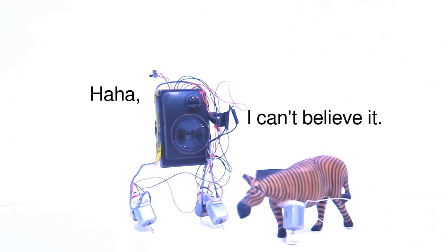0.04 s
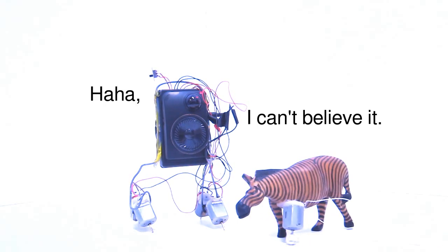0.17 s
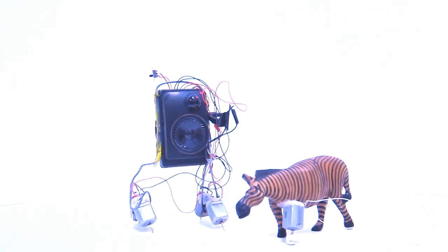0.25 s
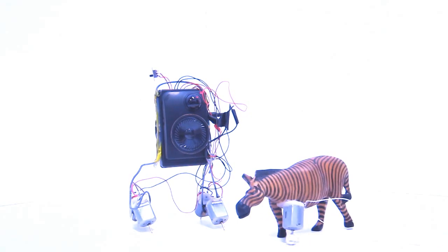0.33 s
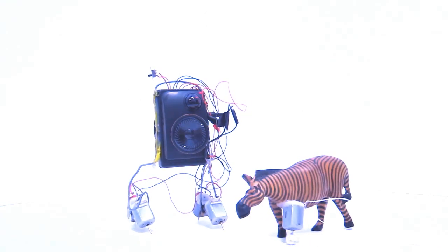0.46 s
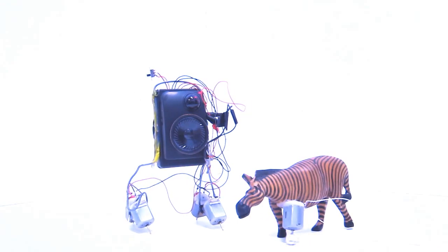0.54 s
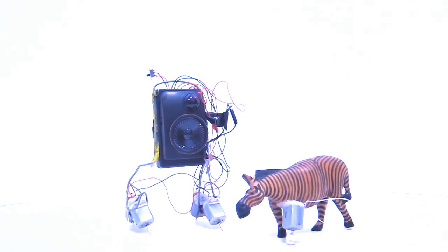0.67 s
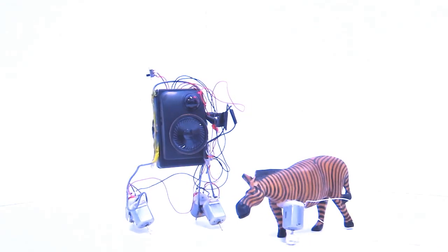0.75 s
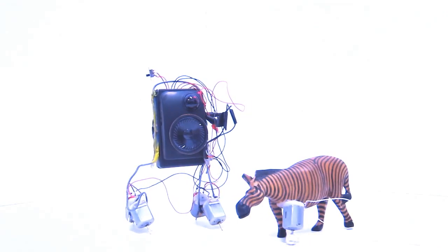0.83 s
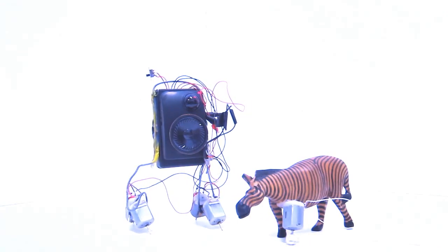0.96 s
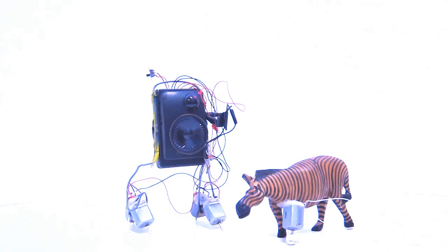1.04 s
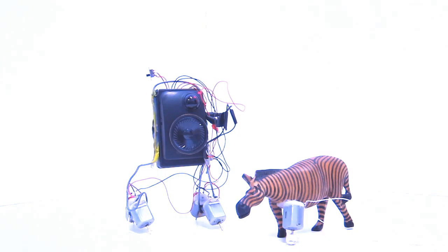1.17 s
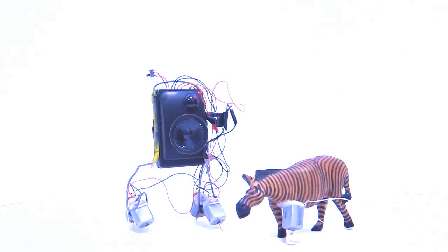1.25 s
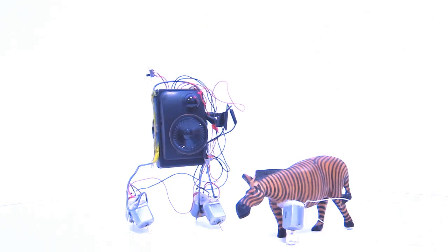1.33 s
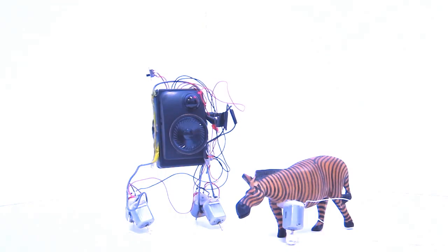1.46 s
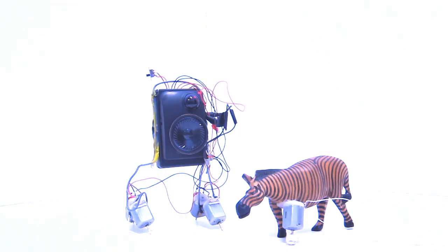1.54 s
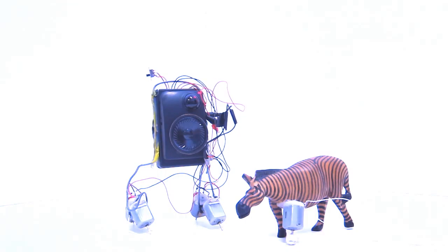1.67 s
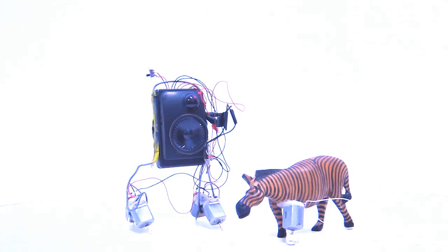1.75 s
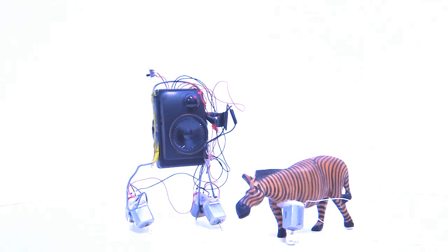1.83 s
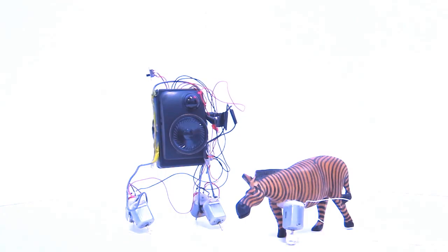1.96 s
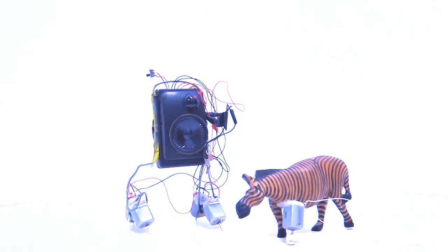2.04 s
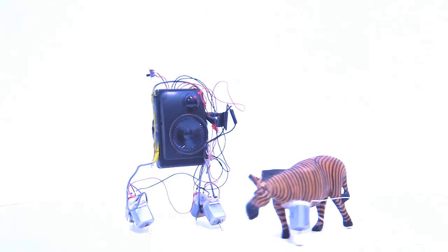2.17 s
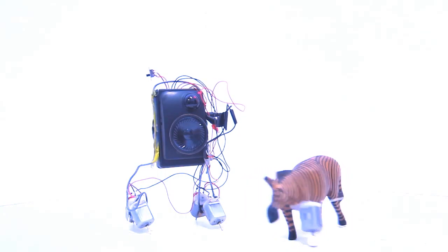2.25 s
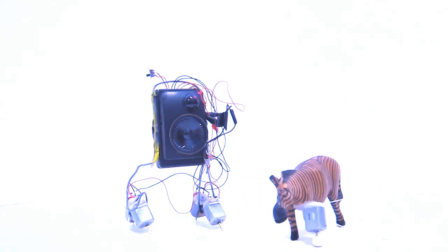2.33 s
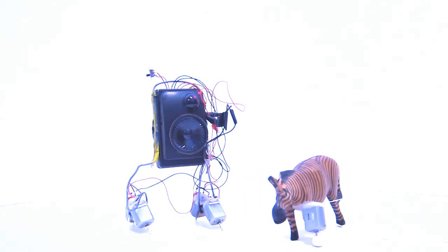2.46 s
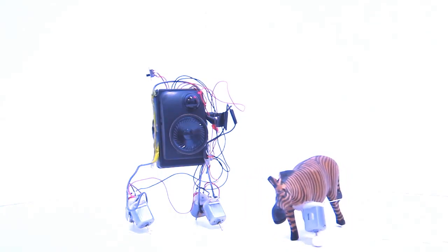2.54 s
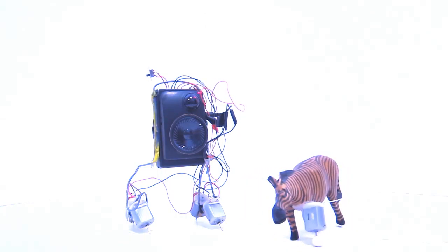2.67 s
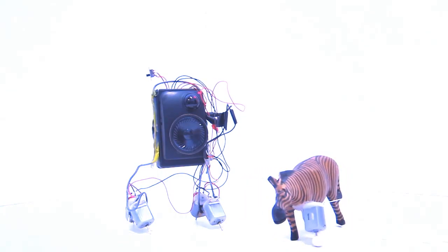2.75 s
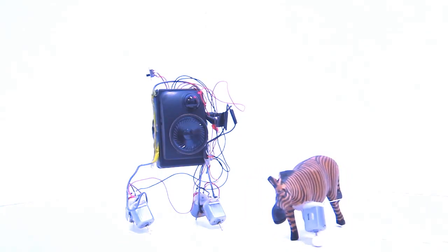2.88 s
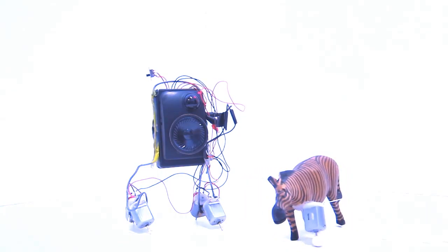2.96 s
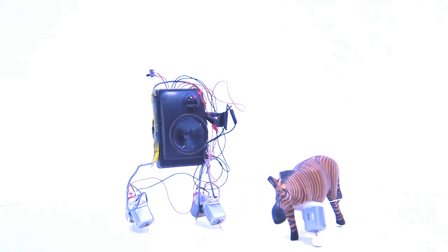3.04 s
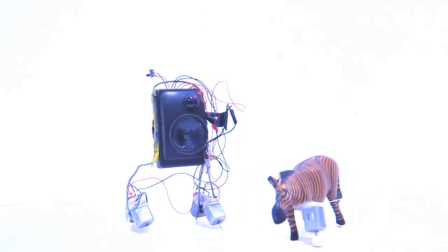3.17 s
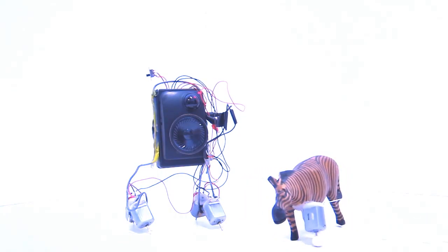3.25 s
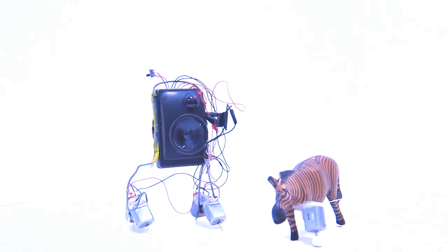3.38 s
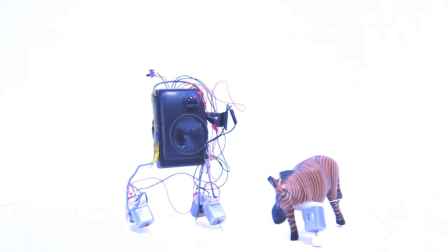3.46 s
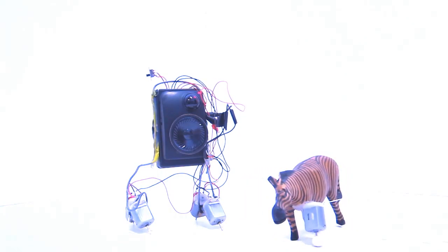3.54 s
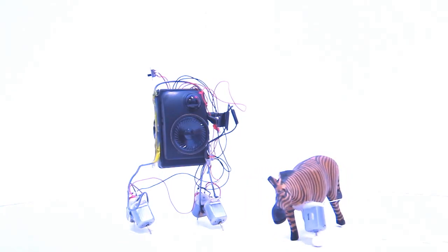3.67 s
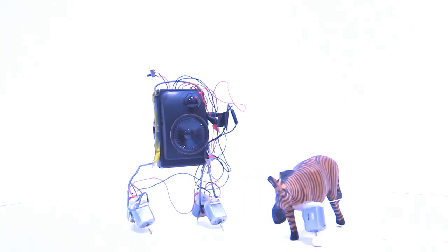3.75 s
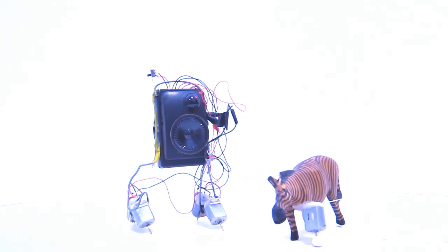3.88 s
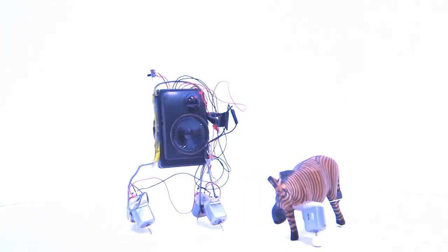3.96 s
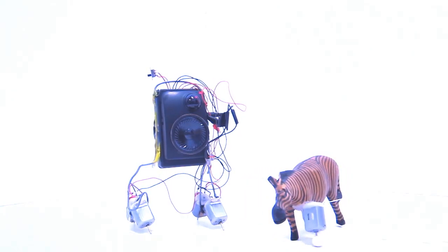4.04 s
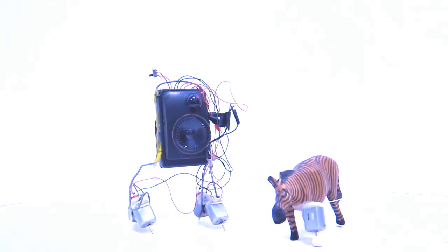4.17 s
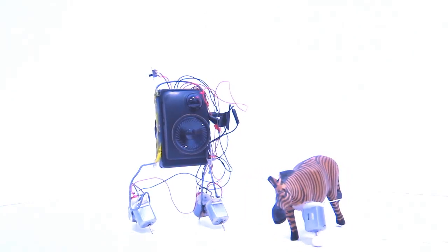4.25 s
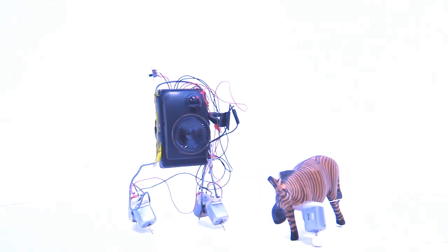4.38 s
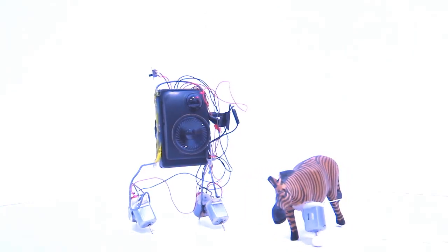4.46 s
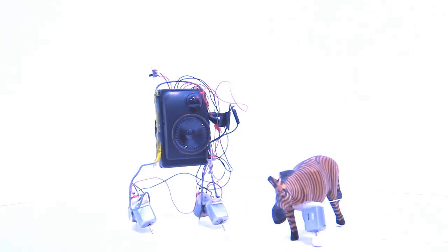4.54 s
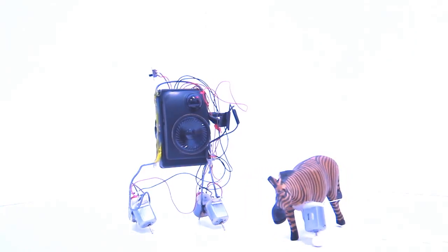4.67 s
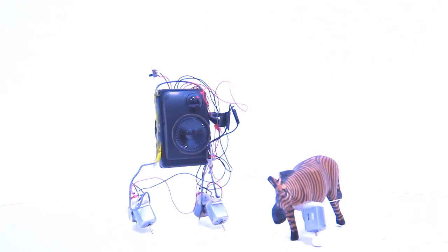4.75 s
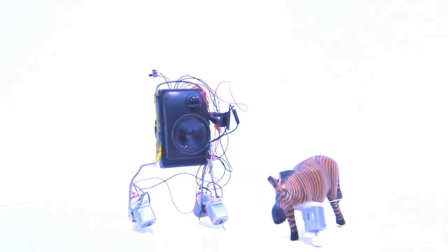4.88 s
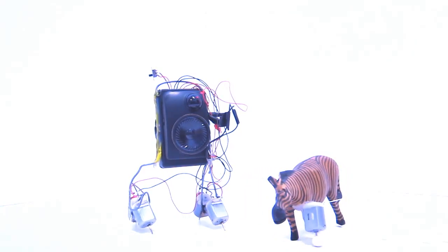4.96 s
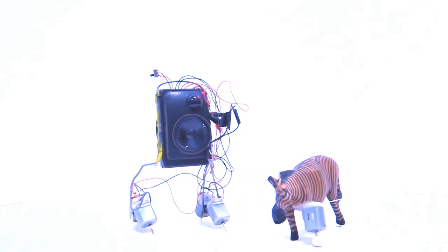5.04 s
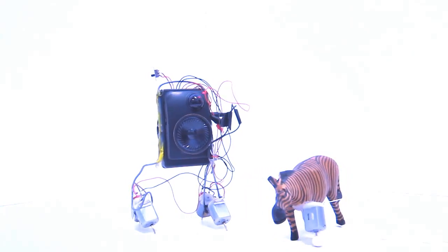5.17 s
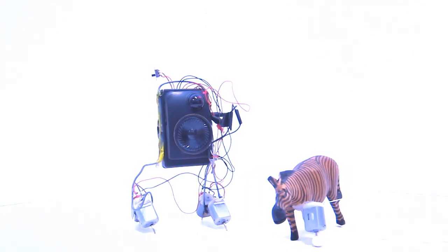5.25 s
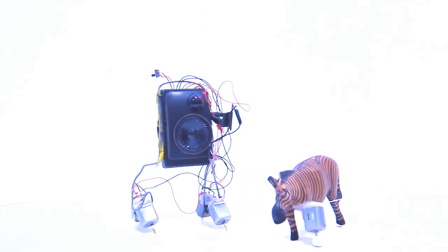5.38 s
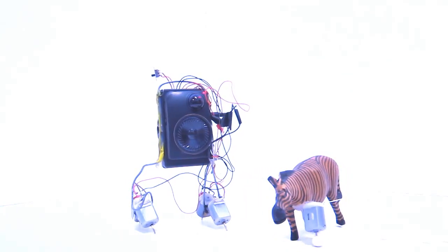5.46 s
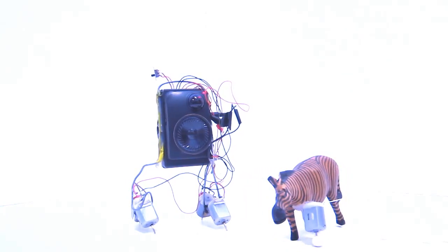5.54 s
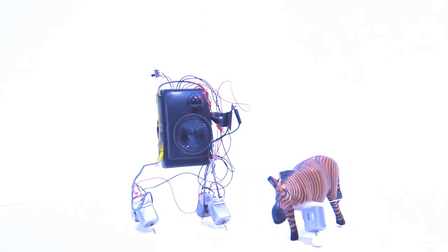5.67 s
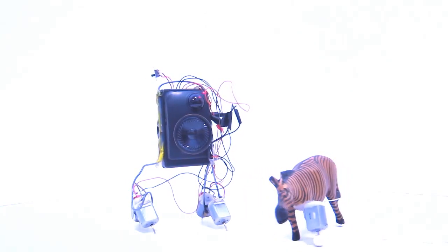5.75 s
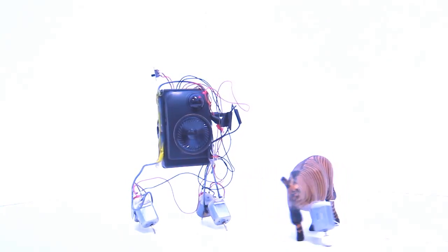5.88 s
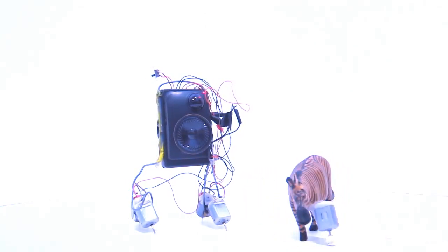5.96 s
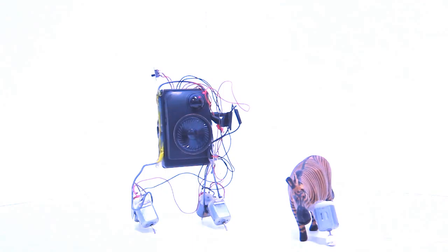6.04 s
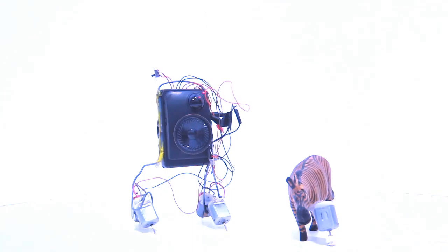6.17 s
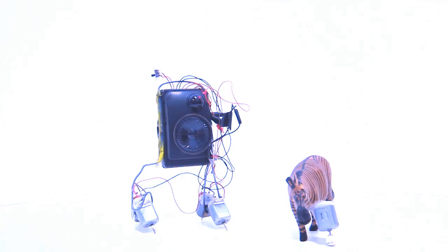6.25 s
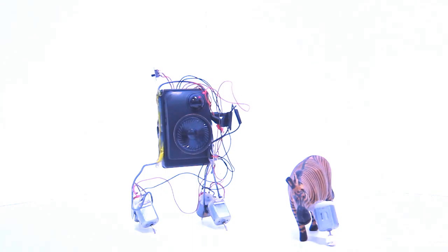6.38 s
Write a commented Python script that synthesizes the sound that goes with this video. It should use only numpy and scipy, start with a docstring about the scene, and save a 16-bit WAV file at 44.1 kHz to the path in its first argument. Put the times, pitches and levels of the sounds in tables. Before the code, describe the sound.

Right at the start, a small electric motor whirrs for an instant and a plastic toy animal lands on a table with one sharp, loud knock. At about 0.4 seconds a box standing on little motors gives a quick, buzzy rattle. A pause follows, with a barely audible tick. From 2.1 to 2.6 seconds the animal's motor whirrs and scrapes while its hooves clatter through four quick knocks and two softer ones. The box rattles very briefly at 3.7 seconds, louder at 4.1, and a little longer around 5, then settles with a faint tick. Near 5.8 seconds the animal whirrs again with a few lighter knocks. Each blow is a gritty click over the hollow thump of the tabletop. Everything sounds close, in a small, quiet room with a low steady hush and a faint, wavering equipment whine.

```python
"""Hard knocks, a motor's whirr and short rattles: two home-made toys twitch on a table.
A plastic zebra hops on its hooves while the motor on its side whirrs and its weight grazes the table.
A loudspeaker box on two small DC motors rattles in bursts, one foot or the other striking once a turn.
Each blow is a gritty click over the thump of the table top; the whirr is brushes ticking and scraping.
Behind them is a small quiet room with a faint whine of equipment."""
import sys
import numpy as np
from scipy import signal
from scipy.fft import rfft, irfft
from scipy.io import wavfile
from scipy.ndimage import uniform_filter1d

SR = 44100
rng = np.random.default_rng(int(sys.argv[2]) if len(sys.argv) > 2 else 0)


def generate_wav(signal):
    """Clip the signal to [-1, 1] and save it as 16-bit WAV at the path in sys.argv[1]."""
    frames = np.transpose(np.atleast_2d(signal))
    scaled = np.clip(frames, -1, 1) * 32767
    pcm = np.round(scaled).astype(np.int16)
    wavfile.write(sys.argv[1], SR, pcm)


N = 282681

# Zebra motor runs. Each row: full power at s, hold in s, whirr in dB, graze in dB, graze cutoff in Hz.
ZEBRA_RUNS = [(0.0, 0.044, -27, -30, 6650), (2.14, .2, -29, -25.5, 15000), (5.815, .175, -31.5, -28, 3280)]
# Motor bursts on the box's lighter and heavier foot. Each row: full power at s, hold in s,
# level in dB, rattle rise in dB/s, rattle fade in dB/s, click cutoff in Hz.
LIGHT_BURSTS = [(0.3978, 0.0086, -16.5, 4000, 4000, 11000), (0.4297, .085, -12.5, 4500, 109, 9500)]
HEAVY_BURSTS = [(3.6748, 0.01, -15.5, 1700, 1500, 4500), (4.138, .012, -11, 517, 900, 13000),
                (4.9581, .001, -22.5, 703, 4000, 5000), (4.9835, .074, -12.5, 4000, 255, 13900)]
# Spectra of the motors and their blows. Each row: frequency in Hz, level in dB.
ZEBRA_SPECTRUM = [(180, -9), (300, -7.5), (571, -15.5), (1090, -33), (1460, -26), (2170, -31),
                  (2520, -18.5), (2830, -22.5), (3070, -22.5), (6900, -33.5), (8140, -40), (9450, -36.5),
                  (15500, -46.5)]
BOX_SPECTRUM = [(21, -18), (35, -24.5), (154, -1.5), (330, -8), (448, -12.5), (564, -20.5), (1210, -24),
                (1770, -26.5), (2810, -15), (3270, -26.5), (4680, -30), (6860, -34.5), (8190, -46),
                (9550, -38), (15500, -58)]
# Stereo likeness of toy and reverb noise. Each row: frequency in Hz, left-right correlation.
CORRELATION = [(100, 0.93), (500, 0.8), (1500, 0.85), (3000, 0.26), (6000, 0), (12000, 0.13)]


def zebra_hooves(hard_db=-4, db_per_octave=5):
    """Hooves land and ring with the table top; only a click above hard_db cracks brighter."""
    # Each row: start in s, click in dB, thump in dB.
    landings = [(0.001, -28, -21), (0.0226, -46, -20.5), (0.0668, 2.5, -7), (0.098, -44, -16.5),
                (2.1748, -18, -10), (2.2171, -11, -11.5), (2.2594, -6, -8.5), (2.3062, -7.5, -9.5),
                (2.454, -20.5, -15), (2.567, -27.5, -25), (5.8224, -23, -13.5), (5.8465, -43, -14),
                (5.894, -16.5, -15), (5.924, -12, -12), (5.9823, -48, -23.5)]
    # Each row: frequency in Hz, level in dB, t60 in s.
    modes = [(107, 1.5, 0.12), (169.5, 4, 0.15), (210.8, -1, 0.27), (291.6, 9.5, 0.14), (376, 1, 0.093),
             (403, -10, 0.057), (647, 3, 0.049), (790, -46, 0.0045), (1100, -47, 0.12), (1938, -8.5, 0.026),
             (2534, -7.5, 0.042), (2866, -8, 0.038)]
    # Each row: frequency in Hz, contact level in dB.
    spectrum = [(24, -1), (40, -42.5), (202, 1), (397, -6), (577, -16), (859, -20), (973, -27.5),
                (1250, -28.5), (2160, -39.5), (2510, -36.5), (3220, -33), (8310, -58), (10900, -45),
                (15500, -75)]
    blows = [(s, click_db, thump_db, 2490 * 2 ** (max(click_db - hard_db, 0) / db_per_octave))
             for s, click_db, thump_db in landings]
    return knocks(blows, modes, spectrum, click_db=12.5, thump_db=25.5, snap_db=-5.5,
                  chatter_t60_s=0.026, clink_db=-3, rumble_db=2, rumble_t60_s=0.042, push_db=0,
                  grain_db=1.5, swell_s=0.0085, detune=0.022)


def zebra_grazes(early_share=0.72, uneven_db=8, count=8):
    """The motor's weight grazes the table as each run starts, then at random in its early part."""
    # Each row: frequency in Hz, level in dB, t60 in s.
    modes = [(400, 0, 0.042), (2544, -0.5, 0.12), (3230, 1, .04), (4070, 6, .02), (6690, 1.5, 0.028),
             (7130, -4, 0.029)]
    blows = []
    for start_s, held_s, _, graze_db, cutoff_hz in ZEBRA_RUNS:
        advance, weakness = rng.random((count, 2)).T
        t = early_share * held_s * np.maximum(np.arange(count) - advance, 0) / (count - 1)
        blows += [(s, db, db, cutoff_hz) for s, db in zip(start_s + t, graze_db - uneven_db * weakness)]
    return knocks(blows, modes, ZEBRA_SPECTRUM, click_db=20, thump_db=23, snap_db=-21,
                  chatter_t60_s=0.044, clink_db=1, rumble_db=-26, rumble_t60_s=0.04, push_db=-8,
                  grain_db=-5.5, swell_s=0.002, detune=0.036)


def zebra_motor():
    """The zebra's motor starts fast, sags under load and stops."""
    # Each row: frequency in Hz, level in dB, t60 in s.
    shell_modes = [(370, -11, 0.025), (2563, -22.5, 0.15), (2960, 6, 0.021), (3750, 3, 0.051),
                   (4500, -1.5, 0.0034)]
    runs = envelopes(ZEBRA_RUNS, rise_db_per_s=800, sag_db_per_s=28, fall_db_per_s=599)
    return whirr(runs, shell_modes, ZEBRA_SPECTRUM, level_db=-4, top_hz=93.6, spin_up_s=0.03,
                 scrape_db=17.5, uneven_db=23, shell_db=-10.5, wobble=0.23)


def box_light_foot():
    """The box's lighter foot rattles unevenly on the table."""
    # Each row: frequency in Hz, level in dB, t60 in s.
    modes = [(106.3, -21, 0.067), (164.6, -19.5, 0.17), (217.1, -10, 0.22), (321.5, 1.5, 0.059),
             (369.7, -0.5, 0.064), (494, -18, 0.076), (556, -12, 0.028), (1001.3, -17, 0.072),
             (1870, 3, 0.024), (2118, 7, 0.035), (2540, -4, 0.031), (3330, -8, 0.042)]
    # Each row: frequency in Hz, contact level in dB.
    spectrum = [(24, -50), (40, -40), (202, -5.5), (253, -12), (368, -11.5), (427, -20.5), (484, -14.5),
                (859, -34), (1020, -25.5), (1280, -35), (2110, -19.5), (3060, -31), (3300, -29),
                (11200, -54), (15500, -45)]
    blows = rattle(LIGHT_BURSTS, turn_hz=94, coast_s=0.03, build_db_per_s=-11, thump_share=0.87,
                   db_per_octave=31, uneven_db=4, jitter_s=0.0005, count=16)
    return knocks(blows, modes, spectrum, click_db=17.5, thump_db=29, snap_db=-18,
                  chatter_t60_s=0.084, clink_db=-2.5, rumble_db=-7.5, rumble_t60_s=0.043, push_db=-22,
                  grain_db=0, swell_s=0.00061, detune=0.012)


def box_heavy_foot():
    """The heavier foot rattles harder as the power stays on; the box settles with faint ticks."""
    # Each row: frequency in Hz, level in dB, t60 in s.
    modes = [(57, -18, 0.47), (103.6, 1.5, 0.11), (149.7, -2.5, 0.1), (226, -7, 0.17), (317.3, 0.5, 0.092),
             (390, -4.5, 0.084), (562, 3.5, 0.044), (899, -13.5, 0.081), (1705, -1.5, 0.039),
             (1806, 1, 0.026), (2534, -9.5, 0.03), (2988, -16, 0.084), (4770, -14.5, 0.026)]
    # Each row: start in s, click in dB, thump in dB, click cutoff in Hz.
    ticks = [(1.614, -42, -60, 2220), (5.258, -38, -40, 1980)]
    blows = rattle(HEAVY_BURSTS, turn_hz=82, coast_s=0.045, build_db_per_s=77, thump_share=0.67,
                   db_per_octave=50, uneven_db=1, jitter_s=0.0006, count=14)
    return knocks(blows + ticks, modes, BOX_SPECTRUM, click_db=15.5, thump_db=23.5, snap_db=-10,
                  chatter_t60_s=0.066, clink_db=-0.5, rumble_db=2, rumble_t60_s=0.031, push_db=-1,
                  grain_db=-1.5, swell_s=0.0084, detune=0.04)


def box_motors():
    """The box's motors whirr under the rattle and coast longer than the zebra's."""
    # Each row: frequency in Hz, level in dB, t60 in s.
    shell_modes = [(109, -16, 0.12), (205, 2, 0.11), (1790, -10, 0.018), (2710, 19, 0.0043),
                   (3760, -5, 0.022), (4950, -14, .01), (10800, 6.5, 0.006)]
    runs = envelopes(LIGHT_BURSTS + HEAVY_BURSTS, rise_db_per_s=379.5, sag_db_per_s=2,
                     fall_db_per_s=171.5)
    return whirr(runs, shell_modes, BOX_SPECTRUM, level_db=-18, top_hz=89.4, spin_up_s=0.04,
                 scrape_db=25, uneven_db=2.5, shell_db=-14, wobble=0.24)


def rattle(bursts, turn_hz, coast_s, build_db_per_s, thump_share, db_per_octave, uneven_db, jitter_s,
           count, lead_turns=3):
    """A foot strikes once a turn under power; coasting, its blows get sparser, weaker and duller."""
    blows = []
    for start_s, held_s, level_db, rise, fade, cutoff_hz in bursts:
        slip, luck = rng.standard_normal((count, 2)).T
        held_s = round(held_s * turn_hz) / turn_hz  # whole turns
        t = (np.arange(count) - lead_turns) / turn_hz
        coasting_s = coast_s * np.expm1(np.maximum(t - held_s, 0) / coast_s)
        t = np.minimum(t, held_s) + coasting_s
        drive_db = rise * np.minimum(t, 0) + build_db_per_s * np.clip(t, 0, held_s) - fade * coasting_s
        force_db = drive_db + uneven_db * luck
        edge_hz = cutoff_hz * 2 ** np.maximum(force_db / db_per_octave, -2)
        lifts_off = drive_db > -33
        strikes = np.transpose([start_s + t + jitter_s * slip, level_db + force_db,
                                level_db + thump_share * force_db, edge_hz])
        blows += list(strikes[lifts_off])
    return blows


def knocks(blows, modes, spectrum, click_db, thump_db, snap_db, chatter_t60_s, clink_db, rumble_db,
           rumble_t60_s, push_db, grain_db, swell_s, detune, vary_db=0.46, split_hz=950):
    """Each blow is a snap, gritty chatter and a clink over the thump of the table top."""
    out, t = np.zeros((2, N)), np.arange(6144) / SR
    contact = colour(signal.unit_impulse((1, 2048)), spectrum)
    push = signal.sosfilt(signal.butter(4, split_hz, "low", fs=SR, output="sos"), contact)
    snap = signal.sosfilt(signal.butter(4, split_hz, "high", fs=SR, output="sos"), contact)
    deep = [mode for mode in modes if mode[0] < 1000]
    bright = [mode for mode in modes if mode[0] >= 1000]
    impulse = t == 0
    swell = 1 - np.exp(-t / swell_s)  # the thump builds over a few milliseconds before it decays
    for start_s, high_db, low_db, cutoff_hz in blows:
        grit = noise_pair(CORRELATION, len(t))
        rebounds = amp(grain_db * unit_rms(uniform_filter1d(rng.standard_normal(len(t)), size=40)))
        chatter = unit_energy(grit * rebounds * decay(t, chatter_t60_s))
        click = unit_energy(convolve(amp(snap_db) * impulse + chatter, snap))
        click += amp(clink_db) * unit_energy(ring(bright, t, vary_db, detune))
        click = signal.lfilter(*signal.butter(3, min(cutoff_hz, 0.45 * SR), fs=SR), click)
        shudder = unit_energy(grit * swell * decay(t, rumble_t60_s))
        rumble = unit_energy(convolve(amp(push_db) * impulse + shudder, push))
        thump = amp(rumble_db) * rumble + unit_energy(swell * ring(deep, t, vary_db, detune))
        add(out, start_s, amp(high_db + click_db) * unit_energy(click))
        add(out, start_s, amp(low_db + thump_db) * unit_energy(thump))
    return out


def envelopes(runs, rise_db_per_s, sag_db_per_s, fall_db_per_s, depth_db=30):
    """Attack, sagging hold and release of each motor run, as corners (s, dB)."""
    shapes = []
    for start_s, held_s, db, *_ in runs:
        end_s, end_db = start_s + held_s, db - sag_db_per_s * held_s
        attack = (max(start_s - depth_db / rise_db_per_s, 0), db - depth_db)
        release = (end_s + depth_db / fall_db_per_s, end_db - depth_db)
        shapes.append([attack, (start_s, db), (end_s, end_db), release])
    return shapes


def whirr(runs, modes, spectrum, level_db, top_hz, spin_up_s, scrape_db, uneven_db, shell_db, wobble):
    """A motor spins up: brushes tick six times a turn and scrape between, ringing its shell."""
    out, shell = np.zeros((2, N)), ring(modes, np.arange(SR // 10) / SR)
    for run in runs:
        s, db = np.transpose(run)
        t = np.arange(s[0], s[-1], 1 / SR)
        turns = np.cumsum(top_hz * (1 - np.exp(-(t - s[0]) / spin_up_s))) / SR
        ticks = np.diff(np.floor(6 * turns), prepend=0)
        ticks = unit_rms(ticks * amp(uneven_db * rng.uniform(-2.6, 1, len(t))))
        scrape = amp(scrape_db) * noise_pair(CORRELATION, len(t))
        brushes = (ticks + scrape) * (1 + wobble * np.sin(2 * np.pi * turns))
        sound = unit_rms(colour(brushes, spectrum)) + amp(shell_db) * unit_rms(convolve(brushes, shell))
        add(out, s[0], amp(np.interp(t, s, db) + level_db) * unit_rms(sound))
    return out


def ring(modes, t, vary_db=0, detune=0):
    """Decaying modes; neighbours start in opposite directions, so the ring swells briefly."""
    hz, db, t60_s = np.transpose(modes)[:, :, None]
    hz = hz * (1 + detune * rng.standard_normal(hz.shape))  # no two blows hit the same spot
    gain = (-1) ** np.arange(len(hz))[:, None] * amp(db + vary_db * rng.standard_normal(hz.shape))
    return (gain * np.sin(2 * np.pi * hz * t) * decay(t, t60_s)).sum(0)


def room(x, build_up_s=0.0073):
    """Dense reflections of a small room, each band decaying at its own rate."""
    # Each row: frequency in Hz, t60 in s.
    t60_s = [(100, 0.32), (300, 0.31), (800, 0.27), (2000, 0.2), (5000, 0.26), (12000, 0.26)]
    hz, t, bands = signal.stft(noise_pair(CORRELATION, SR // 2), SR, nperseg=256)
    tail = signal.istft(bands * decay(t, value_at(t60_s, hz)[:, None]), SR, nperseg=256)[1]
    tail *= 1 - np.exp(-(np.arange(tail.shape[1]) / SR / build_up_s) ** 2)
    return convolve(x, unit_energy(tail))


def room_noise(level_db=-50):
    """Steady, bass-heavy hush."""
    # Each row: frequency in Hz, level in dB.
    spectrum = [(15, -39), (25, -9.5), (59, -4.5), (221, -6), (378, -12), (648, -16), (895, -15),
                (1850, -19), (2010, -20), (2360, -21), (3440, -24), (6920, -32.5), (8130, -41.5),
                (8810, -35), (15500, -37)]
    # Each row: frequency in Hz, left-right correlation.
    correlation = [(60, 0.36), (180, 0.39), (550, 0.46), (1650, 0.23), (4970, 0.023), (15000, 0.14)]
    gain = amp(value_at(spectrum, np.fft.rfftfreq(N, 1 / SR)))
    return amp(level_db) * unit_rms(irfft(rfft(noise_pair(correlation, N)) * gain, N))


def equipment_whine(start_db=-11, rise_s=1.6):
    """Thin wavering tones; most fade in and swell at random."""
    # Each row: frequency in Hz, level in dB, waver in Hz, share of fade-in and swell from 0 to 1.
    tones = [(58.4, -58.5, 1.55, 0.2), (670, -70, 1.58, 0.6), (1610, -69.5, 3.17, 0.75),
             (1995, -65, 7.16, 0.74), (1977, -71.5, 10.81, 1), (3280, -72, 14.1, 0), (3530, -78.5, 26.7, 0),
             (3480, -72.5, 26.6, 1), (8808, -73, 5, 0.8)]
    fade_in_db = start_db * np.maximum(1 - np.arange(N) / SR / rise_s, 0)
    swell_db, waver = 1.8 * drift(rate_hz=3.5), drift(rate_hz=38.6)
    whine = 0
    for hz, db, waver_hz, share in tones:
        shift = rng.integers(N)
        cycles = np.cumsum(hz + waver_hz * np.roll(waver, shift)) / SR
        gain = amp(db + share * (fade_in_db + np.roll(swell_db, shift)))
        whine += gain * unit_rms(np.sin(2 * np.pi * cycles))
    return whine


def balance(x):
    """Leans the sound slightly right, except for a faint lean left around 4 to 8 kHz."""
    # Each row: frequency in Hz, left minus right in dB.
    balance_db = [(60, -2), (150, -1), (300, -1.2), (550, -3), (1000, -1.8), (2200, -1.8), (4500, 0.3),
                  (12000, -0.5)]
    left_db = value_at(balance_db, np.fft.rfftfreq(N, 1 / SR))
    return irfft(rfft(x) * amp([left_db / 2, -left_db / 2]), N)


def noise_pair(correlation, size):
    """Stereo white noise with the given left-right correlation by frequency."""
    mid, side = rfft(rng.standard_normal((2, size)))
    same = np.clip(value_at(correlation, np.fft.rfftfreq(size, 1 / SR)), -1, 1)
    mid, side = mid * np.sqrt(1 + same), side * np.sqrt(1 - same)
    return unit_rms(irfft([mid + side, mid - side], size))


def drift(rate_hz):
    """Slow random curve of rms 1."""
    hz = np.fft.rfftfreq(N, 1 / SR)
    return unit_rms(irfft(rfft(rng.standard_normal(N)) * np.exp(-(hz / rate_hz) ** 2), N))


def colour(x, spectrum, size=8192):
    """Minimum-phase filter with the given spectrum."""
    db = np.maximum(value_at(spectrum, abs(np.fft.fftfreq(size, 1 / SR))), -100)
    response = np.exp(np.conj(signal.hilbert(np.log(amp(db)))))
    return convolve(x, np.fft.ifft(response).real[:size // 2])


def value_at(points, hz):
    """Interpolates over log frequency."""
    point_hz, value = np.transpose(points)
    return np.interp(np.log(hz + 1), np.log(point_hz + 1), value)


def convolve(x, response):
    return signal.fftconvolve(x, np.atleast_2d(response), axes=1)[:, :x.shape[1]]


def add(mix, start_s, sound):
    part = mix[:, max(round(start_s * SR), 0):][:, :sound.shape[-1]]
    part += sound[..., :part.shape[1]]


def decay(t, t60_s):
    return np.exp(-np.log(1000) * t / t60_s)


def amp(db):
    return 10 ** (np.asarray(db) / 20)


def unit_rms(x):
    return x / np.sqrt(np.mean(x ** 2) + 1e-20)


def unit_energy(x):
    return unit_rms(x) / np.sqrt(x.shape[-1])


def scene():
    """Both toys, their reflections and the background."""
    zebra = zebra_hooves() + zebra_grazes() + zebra_motor()
    light_foot = box_light_foot()
    box = box_heavy_foot() + box_motors()
    reflections = room(amp(-10) * zebra + amp(-11.5) * light_foot + amp(-12.5) * box)
    return balance(zebra + light_foot + box + reflections + room_noise() + equipment_whine())


def record(dry, threshold_db=-12, slope=0.54, recovery_db_per_s=6.5, notch_hz=8230, edge_hz=15750):
    """Gain control dips after the loudest blows; then a treble notch, clipping and a band limit."""
    power_db = 10 * np.log10(abs(uniform_filter1d((dry ** 2).mean(0), size=400)) + 1e-12)
    fall_db = np.arange(N) * recovery_db_per_s / SR
    held_db = np.maximum.accumulate(power_db + fall_db) - fall_db
    over_db = np.maximum(held_db - threshold_db, 0)
    ducked = dry / amp(slope * uniform_filter1d(over_db, size=100))
    notch = signal.iirnotch(notch_hz, Q=14, fs=SR)
    notched = signal.lfilter(*notch, signal.lfilter(*notch, ducked))
    lowpass = signal.firwin(511, edge_hz, window=("kaiser", 9), fs=SR)
    return signal.oaconvolve(np.clip(notched, -1, 1), lowpass[None], "same")


dry = scene()
out = record(dry)
generate_wav(out)
```